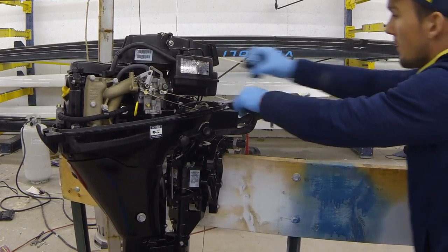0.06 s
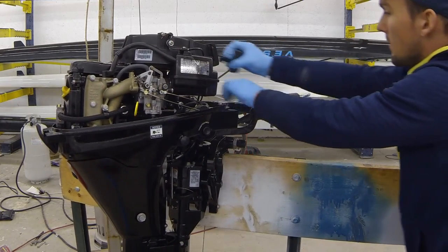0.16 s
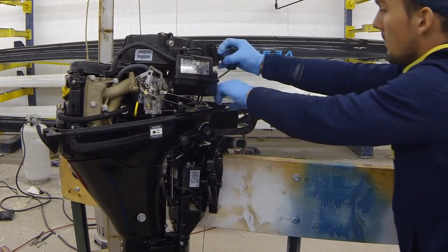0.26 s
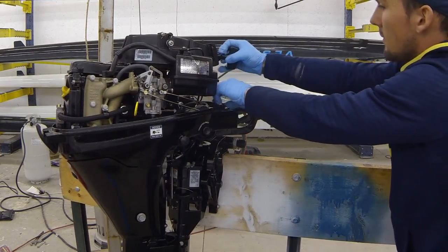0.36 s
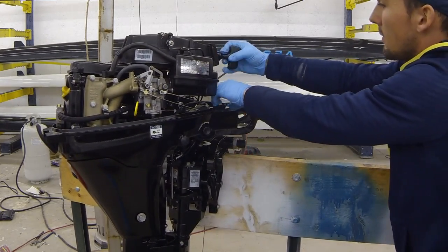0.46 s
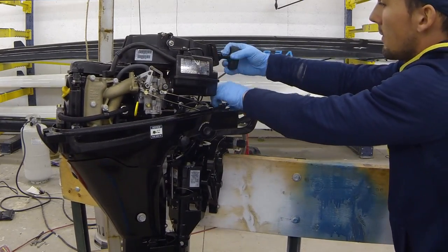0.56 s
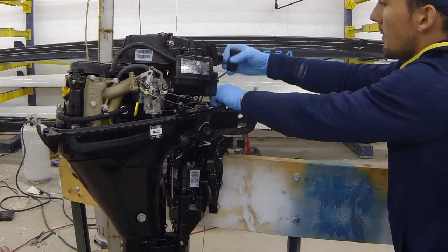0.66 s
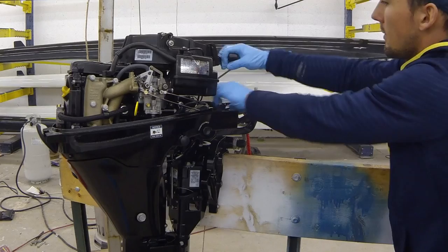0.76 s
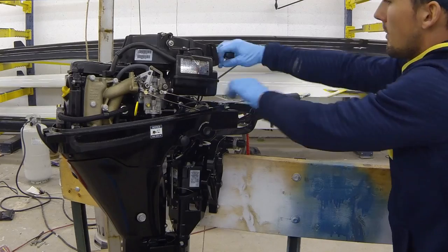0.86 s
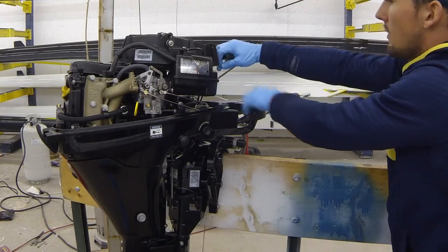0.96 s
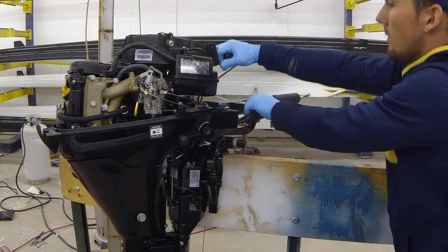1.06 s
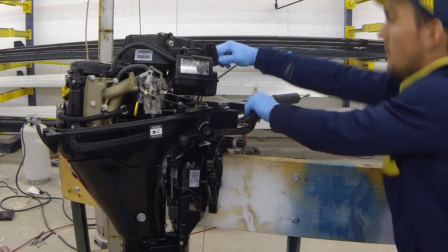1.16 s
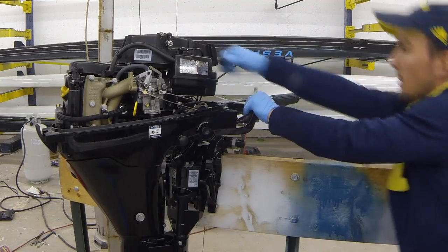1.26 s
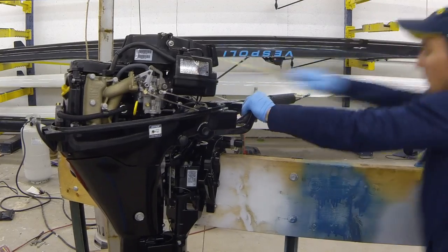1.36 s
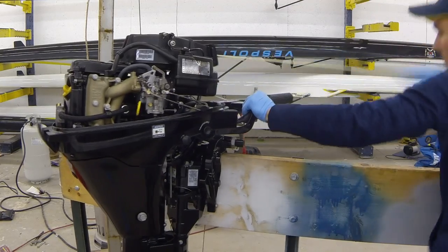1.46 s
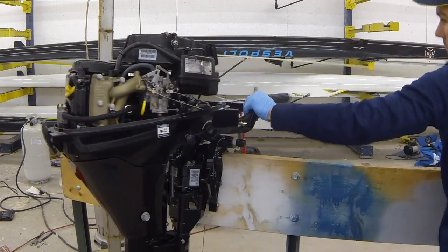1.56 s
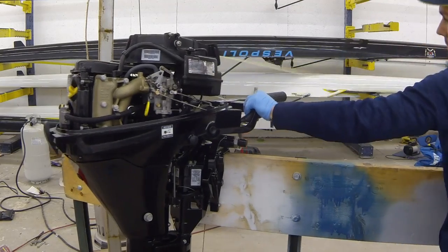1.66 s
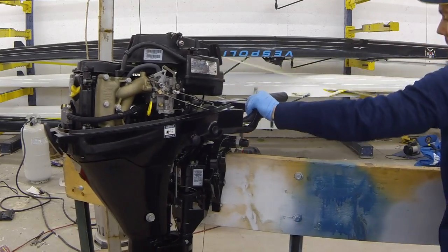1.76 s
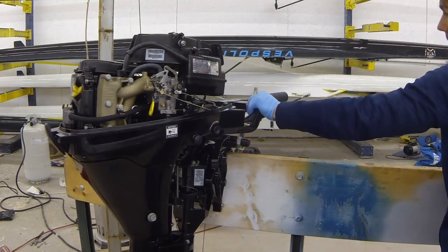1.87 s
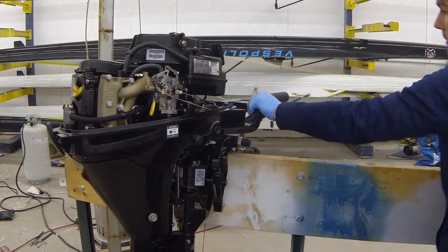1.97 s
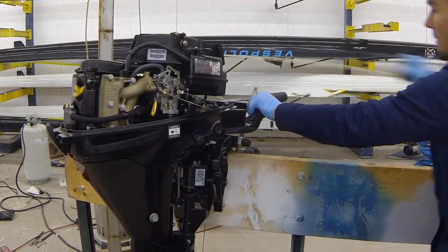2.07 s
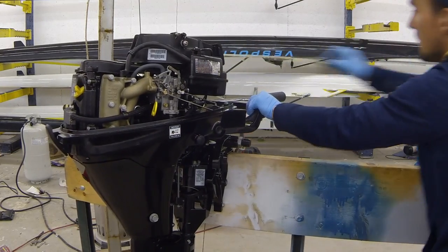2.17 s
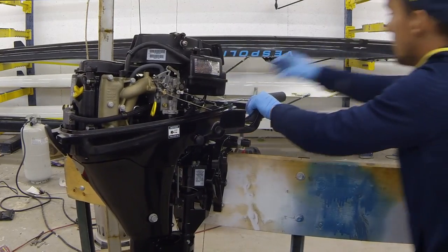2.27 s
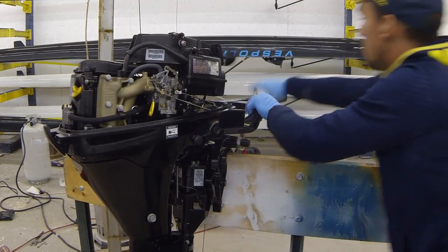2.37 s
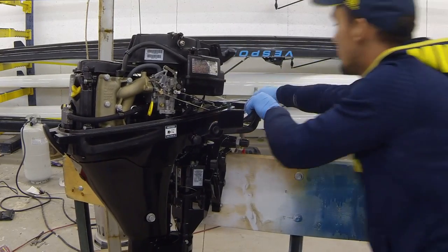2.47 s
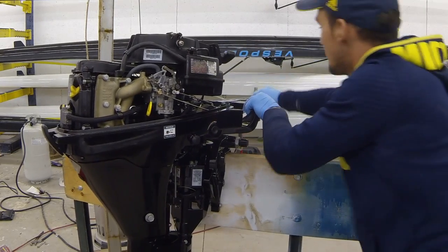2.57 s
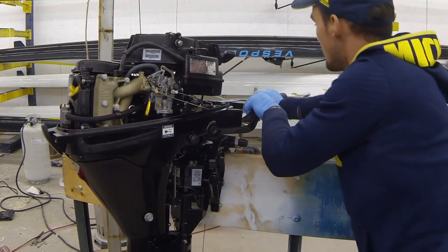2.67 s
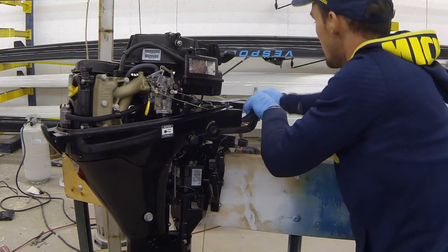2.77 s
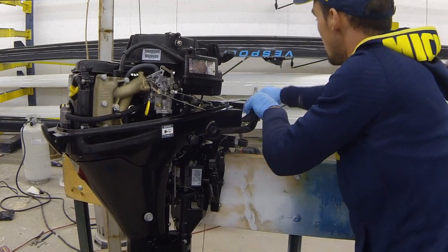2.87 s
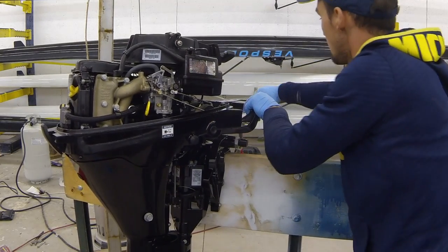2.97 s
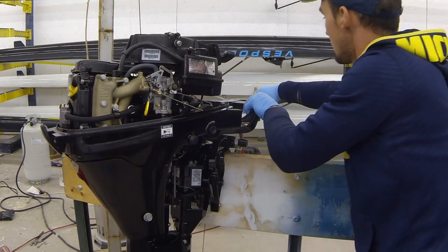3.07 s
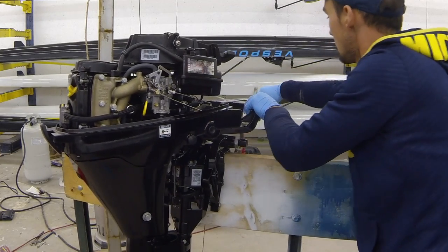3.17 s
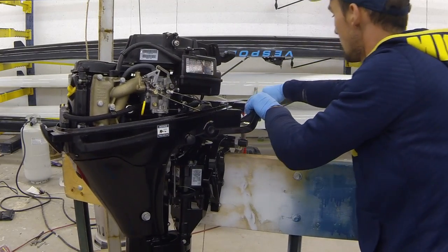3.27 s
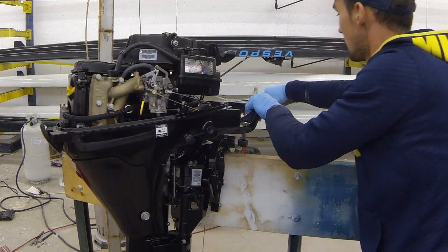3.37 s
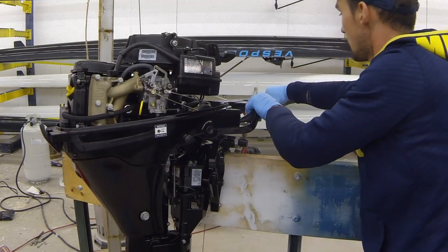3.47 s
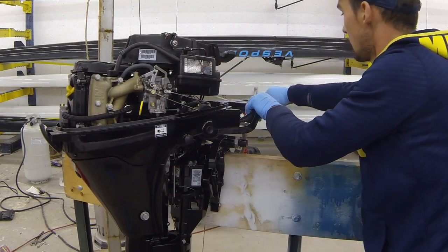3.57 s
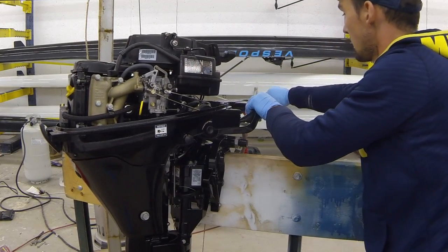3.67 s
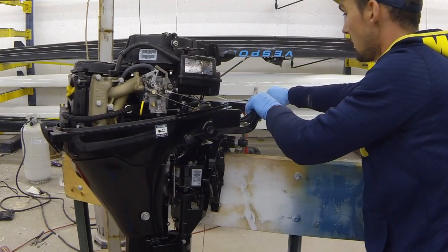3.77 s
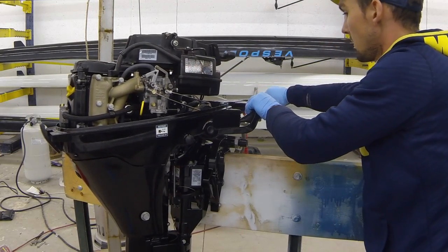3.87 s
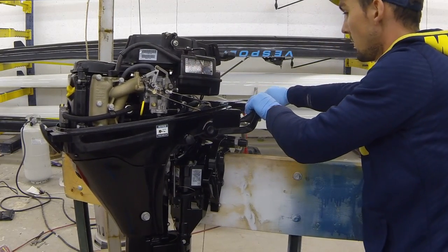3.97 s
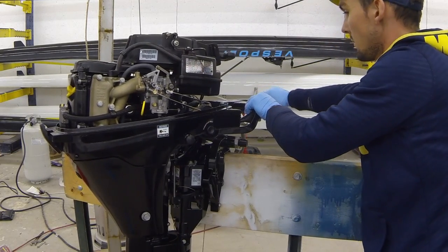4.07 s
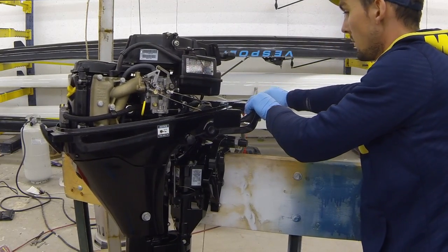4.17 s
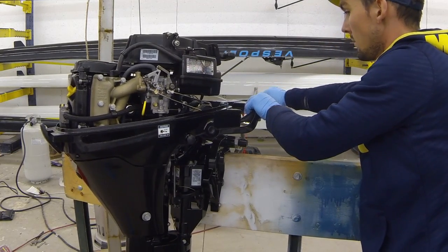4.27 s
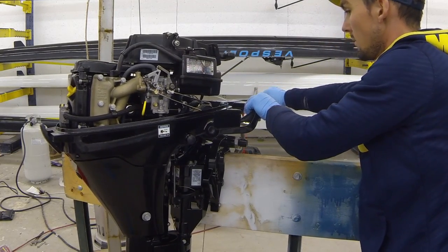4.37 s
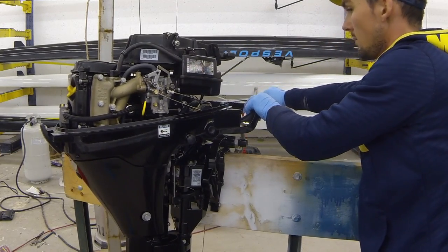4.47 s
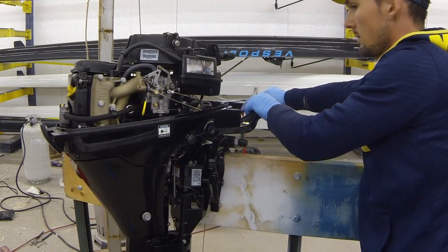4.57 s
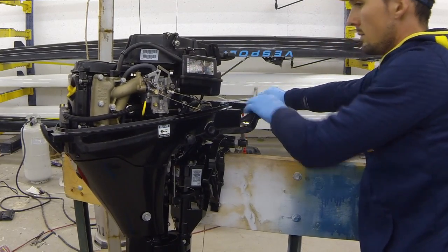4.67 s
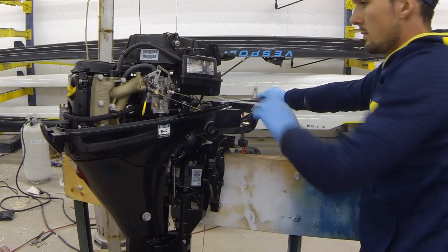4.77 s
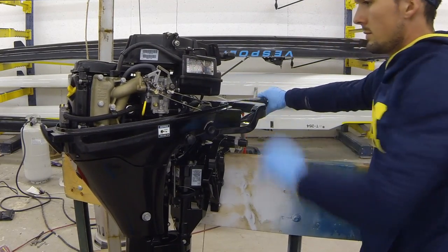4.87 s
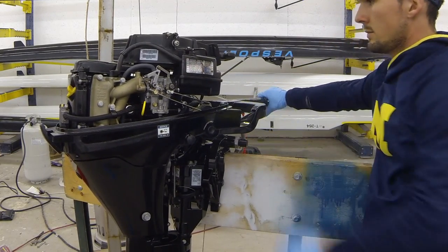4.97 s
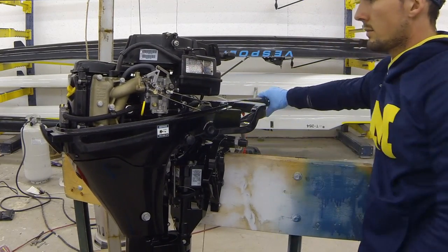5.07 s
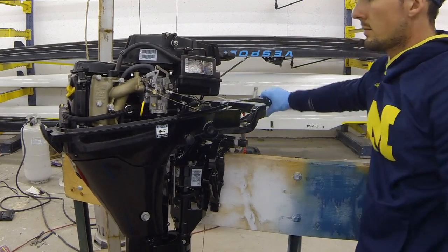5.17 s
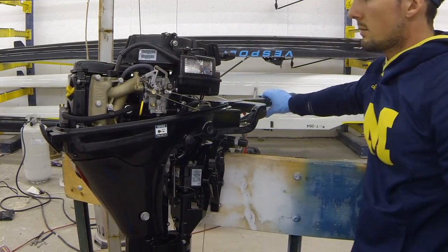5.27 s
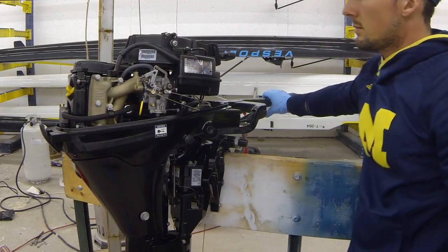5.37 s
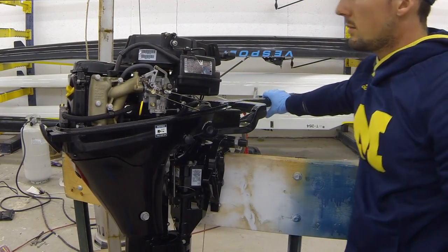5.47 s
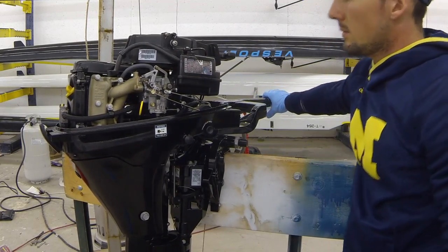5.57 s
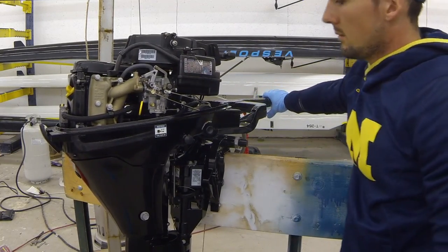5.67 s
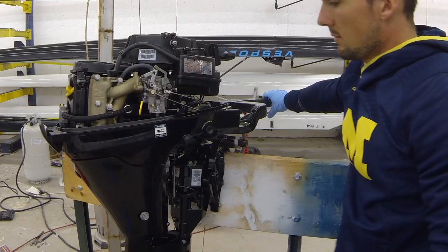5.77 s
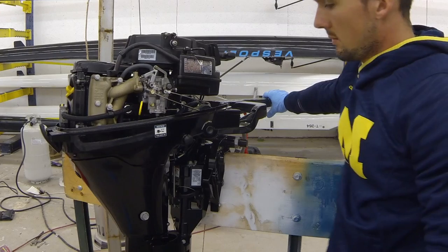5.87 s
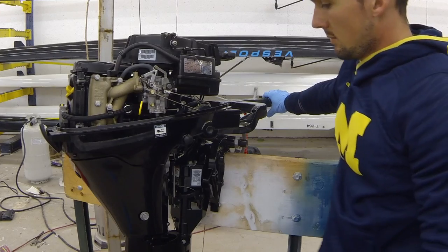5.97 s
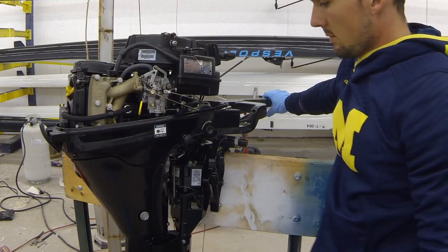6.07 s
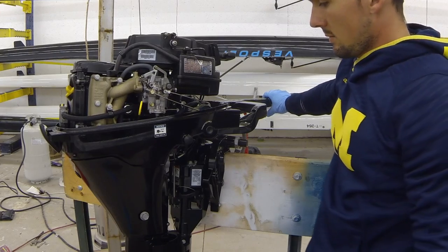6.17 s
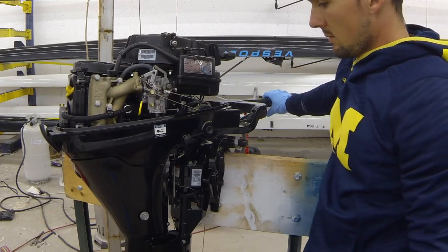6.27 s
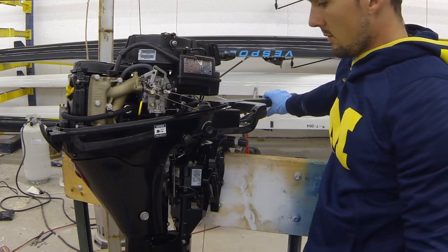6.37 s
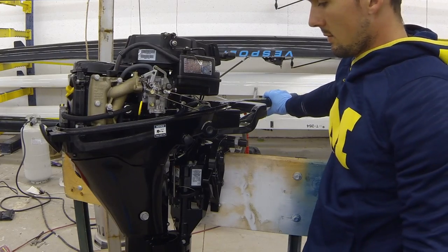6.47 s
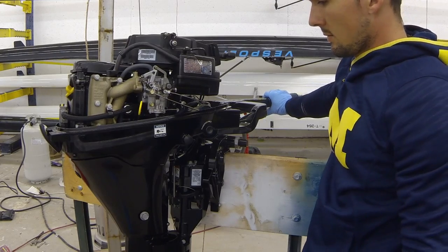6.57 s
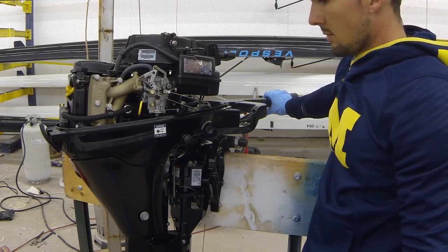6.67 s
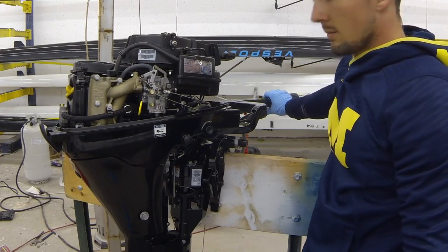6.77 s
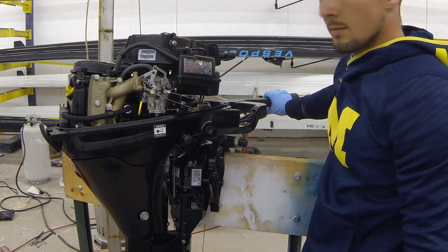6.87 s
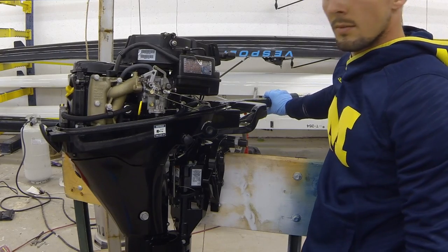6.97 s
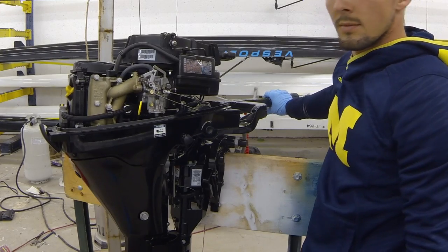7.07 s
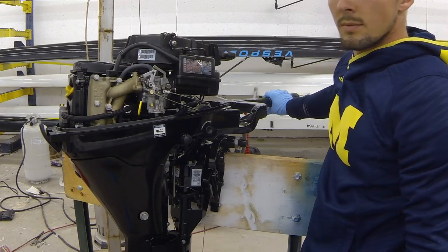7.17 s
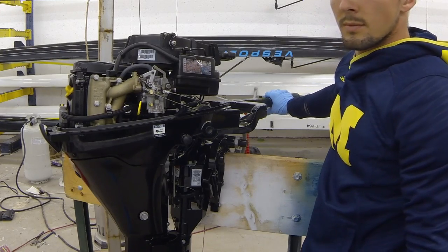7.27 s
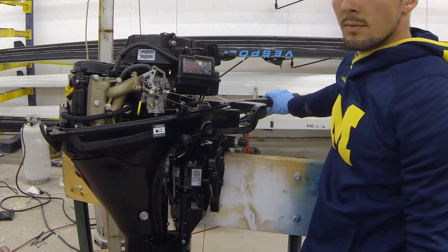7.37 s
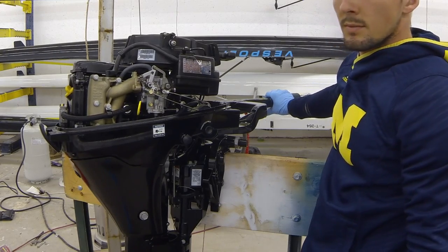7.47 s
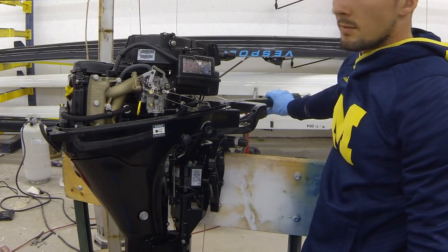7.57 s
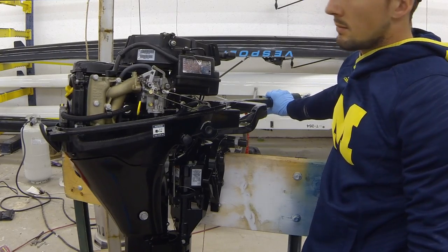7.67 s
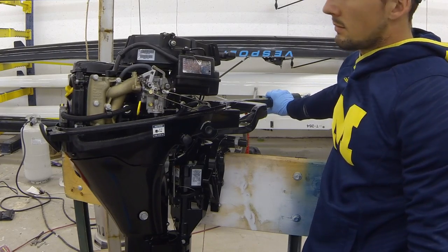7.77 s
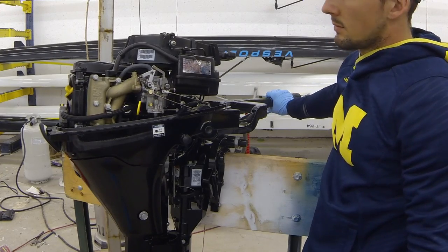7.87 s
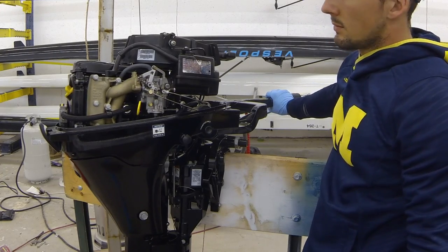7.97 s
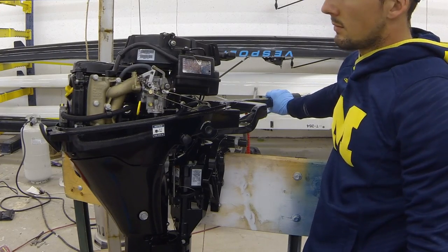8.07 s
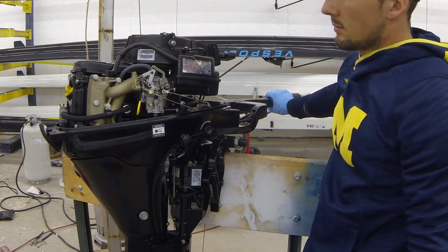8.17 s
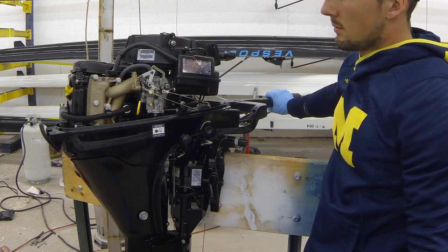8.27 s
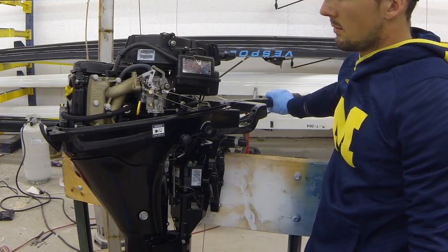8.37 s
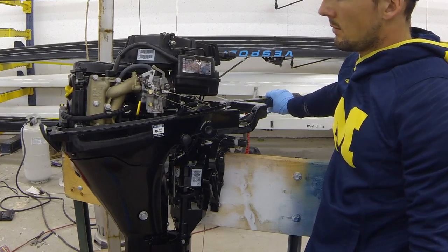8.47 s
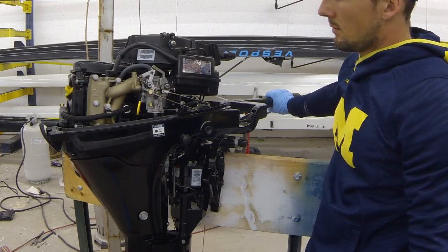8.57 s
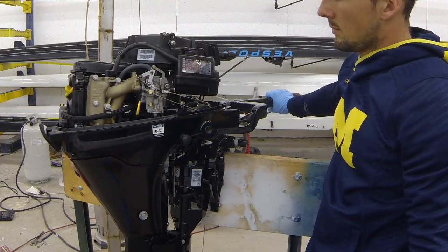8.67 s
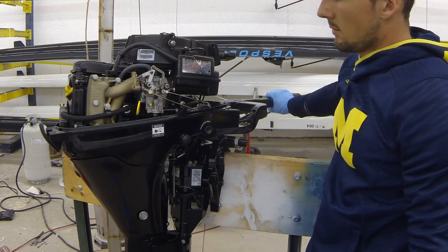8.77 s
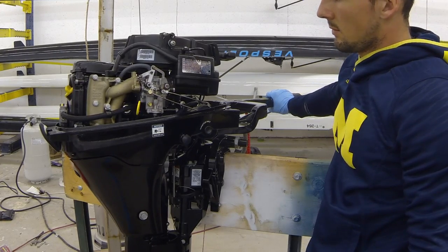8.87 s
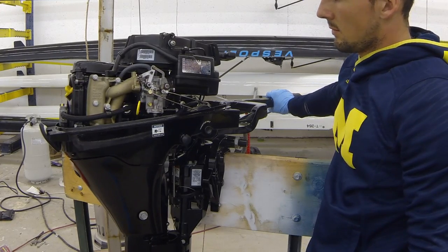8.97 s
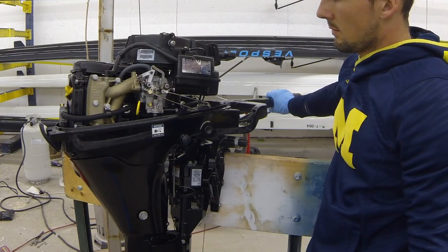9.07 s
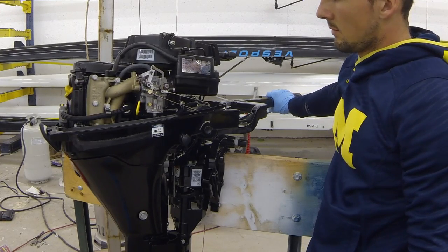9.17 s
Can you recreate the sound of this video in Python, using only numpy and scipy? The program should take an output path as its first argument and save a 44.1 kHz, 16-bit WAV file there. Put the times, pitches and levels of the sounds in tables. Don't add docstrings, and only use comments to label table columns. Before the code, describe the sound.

Starter rope whirs back and its handle knocks home; one hard pull clanks, and a small outboard motor catches, races, nearly stalls, then idles fast.

```python
import sys
import numpy as np
from scipy import signal
from scipy.fft import rfft, irfft
from scipy.io import wavfile
from scipy.ndimage import uniform_filter1d

SR = 44100
rng = np.random.default_rng(int(sys.argv[2]) if len(sys.argv) > 2 else 0)


def level_to_linear(level):
    exponent = np.asarray(level, float) / 20
    return 10 ** exponent


def to_wav(s):
    ch = np.atleast_2d(s).T
    pcm = np.round(np.clip(ch, -1, 1) * 32767)
    wavfile.write(sys.argv[1], SR, pcm.astype(np.int16))


N = 407043
T = np.arange(N) / SR

# (frequency [Hz], density [dB per Hz]); then its level [dB]
AIR_COLOUR, AIR_DB = [(15, -49), (25, -3), (44, 3.5), (55, -2), (136, -14), (189, -21.5), (214, -20.5),
                      (313, -21), (374, -35), (604, -22), (797, -23.5), (1110, -21), (1840, -28),
                      (9020, -45.5), (10500, -50), (13600, -88), (22000, -120)], -48.5
# (frequency [Hz], t60 [s])
SHOP_DECAY = [(150, 4.8), (650, 1.08), (1500, 0.73), (2600, 0.31), (7000, 0.4)]
# (frequency [Hz], width [Hz], share [1])
STANDING_WAVES = [(92.6, 10.2, 0.9), (117.8, 3.1, 1.35), (144.7, 3.8, 0.55), (175.6, 2, -0.91),
                  (198.3, 13, 0.67), (275.6, 12.4, 0.23)]

# (time [s], peak [dB], bounce delay [s], bounce level [dB], pitch factor [1])
HANDLE_KNOCKS = [
    (0.247, -12, 0.0089, -9.5, 0.96),
    (0.892, -25.5, 0.0098, -1, 0.99),
]
# (frequency [Hz], level [dB], t60 [s])
HANDLE_MODES = [(481, -21, 0.065), (669, -9.5, 0.078), (985, -12, .06), (1156, -5.5, 0.038),
                (1360, -4, 0.029), (1460, 0.5, 0.022), (2040, -18, 0.033), (3160, -11, 0.013),
                (3800, -28, 0.025), (7900, -29, .008)]
# (time [s], peak [dB], pitch factor [1])
PAWL_HITS = [(1.3, -39, 0.82), (1.334, -30.5, 1.9), (1.369, -3, 1.05), (1.38, -6.5, 1.01),
             (1.604, -19.5, 0.95), (1.627, -9, 1.01), (1.678, -28, 0.84), (1.691, -23, 1.6),
             (1.722, -10.5, 1.15)]
# (frequency [Hz], level [dB], t60 [s])
PAWL_MODES = [(662, -7.5, 0.29), (1518, 1, 0.081), (2100, -3.5, 0.076), (2750, -4.5, 0.034),
              (3680, -19, 0.24), (4020, -19, 0.44), (5150, -14, 0.057), (5960, -33, 0.34),
              (6400, -18, 0.051), (7386, -60, 0.053), (7550, -26, 0.19), (9300, -28, 0.19)]
# (time [s], peak [dB])
STARTER_TICKS = [(0.1815, -47), (0.2089, -47), (0.7694, -56), (1.247, -32.5)]
# (frequency [Hz], density [dB per Hz])
ROPE_COLOUR = [(59, -22), (100, -22), (202, -8), (416, -5), (656, 1.5), (914, -4), (1470, 2), (1880, -9),
               (2270, -8.5), (3160, -12), (3500, -14), (7690, -31), (14000, -89)]
# (time [s], level [dB], whirr centre [Hz])
ROPE_PULL = [(1.29, -74, 1300), (1.334, -31, 1450), (1.352, -44, 1480), (1.37, -6, 1470),
             (1.414, -18, 1210), (1.505, -16.5, 1510), (1.56, -18.5, 1230), (1.64, -13.5, 1520),
             (1.799, -40, 1550)]
REWIND_END_S = 0.24

# (time [s], firing rate [Hz])
FIRING_RATE = [(1.45, 7.31), (1.614, 14.48), (1.675, 22.53), (1.936, 24.59), (2.247, 46.15), (2.481, 48.27),
               (2.801, 47.03), (2.806, 43.46), (3.059, 48.35), (3.439, 28.75), (3.734, 17.39),
               (4.103, 25.8), (4.352, 33.16), (4.656, 34.15), (7.009, 34.73), (8.328, 35.66),
               (8.679, 34.51), (9.25, 26.19)]
# (time [s], strength [dB], harshness against a smooth idle [dB])
BURN = [(1.58, -31, 3), (1.63, -17, 13.5), (1.74, -21.5, 6.5), (2.1, -17.5, 7.5), (2.3, -17, 6),
        (2.6, -17.5, 4), (2.87, -20, 2), (3.03, -17, 2.5), (3.16, -20, -4), (3.4, -25, -10.5),
        (3.6, -25, -12), (3.76, -24.5, -3), (3.9, -18, 4.5), (4.25, -16, 4), (4.5, -15, -1.5),
        (5.6, -13.5, 1), (8.4, -13, 0), (9.2, -16.5, -3)]
# (start [s], end [s], level [dB])
MISFIRES = [
    (1.745, 1.785, -11),
    (2.545, 2.635, -40),
    (2.66, 2.885, -14.5),
    (2.89, 2.92, 6.5),
]
# (time [s], extra level [dB])
HARD_FIRINGS = [(2.1245, 3), (2.2218, 0.5), (2.4782, 0), (2.6433, 4.5), (2.7491, 9), (2.9306, 9.5),
                (4.3529, 1.5)]
# (worst time [s], extra level [dB], build [s], ease [s])
KNOCKING_BOUTS = [
    (1.912, 10.5, 0.24, 0.37),
    (3.87, 8, 0.062, 0.43),
]

# (delay [ms], share [1])
PIPE_ECHOES = [(7.2, .6), (13.4, .3), (23.0, .1), (31.0, .08)]
# (firing rate [Hz], level [dB])
CAVITY_BOOM = [(18, 3.5), (25, 3.5), (30, -3), (33.5, -7.5), (35.5, -5.5), (48, -0.5)]
# (firing rate [Hz], level [dB])
MUFFLER_CHAMBER = [(20, -20), (30, -12.5), (47, -1)]

# (frequency [Hz], width [Hz], level [dB])
CASING_CHOKED = [(603, 22, -3.5), (846, 24, 7), (1416, 220, -3.5), (1818, 70, 9), (2433, 150, 3),
                 (3726, 12, 3.5), (4240, 180, -4.5), (4503, 18, -8), (4950, 360, -7), (5350, 63, -5),
                 (5470, 49, -14), (5870, 14, -7.5), (6360, 37, -24.5), (6430, 68, -14), (8320, 21, -13),
                 (9240, 26, -32)]
# (frequency [Hz], width [Hz], level [dB])
CASING_IDLE = [(816, 60, 2.5), (1283, 64, -0.5), (1615, 23.7, 2.5), (2125, 90, -0.5), (2445, 144, -0.5),
               (3340, 14, -15), (3706, 18, -2), (4640, 220, -4), (5130, 156, -6.5), (5450, 15, -7.5),
               (5720, 11, -7.5), (6575, 20, -15.5), (7970, 66, -15), (8510, 13, -22.5), (9580, 15, -21.5)]
# (frequency [Hz], density [dB per Hz])
HISS_COLOUR = [(210, -33), (350, -7), (495, -19), (858, -16.5), (973, -12), (1460, -19.5), (1610, -13.5),
               (1910, -16.5), (2130, -12), (4070, -16.5), (4610, -31), (8000, -24), (11100, -38),
               (15000, -60)]
HISS_EDGES = [300, 1100, 2000, 3200, 4200, 6200, 9000, 16000]
# (frequency [Hz], width [Hz], level [dB])
STAND_VALLEYS = [(417, 23, -13.5), (984, 27.5, -15.5), (1830, 20, -40.5), (3935, 264, -6.5)]
# (time [s], frequency [Hz], level [dB])
INTAKE_WHISTLE = [(3.0, 810, -79), (3.1, 757, -38), (3.3, 731, -39.5), (3.6, 724, -44.5), (3.8, 685, -47)]


def evened(x):
    return x / np.sqrt(np.mean(x ** 2) + 1e-20)


def levelled(x, span=0.32):
    width = int(span * SR)
    power = uniform_filter1d(uniform_filter1d(x ** 2, width), width)
    return x / np.sqrt(abs(power) + 1e-3 * np.mean(x ** 2))


def read(points, hz):
    f, value = np.transpose(points)
    return np.interp(np.log(hz + 1), np.log(f + 1), value)


def curves(rows):
    s, *columns = np.transpose(rows)
    return [np.interp(T, s, column) for column in columns]


def coloured(x, spectrum):
    gain = level_to_linear(read(spectrum, np.fft.rfftfreq(len(x), 1 / SR)))
    return irfft(rfft(x) * gain, len(x))


def resonate(x, hz, width):
    turn = np.exp(2j * np.pi * np.cumsum(hz * np.ones(len(x))) / SR)
    r = np.exp(-np.pi * width / SR)
    return 2 * (turn * signal.lfilter([1 - r], [1, -r], x / turn)).real


def add(mix, s, sound):
    part = mix[round(s * SR):][:len(sound)]
    part += sound[:len(part)]


def room_air():
    return level_to_linear(AIR_DB) * evened(coloured(rng.standard_normal(N), AIR_COLOUR))


def shop(x):
    taps = np.zeros(2 * SR)
    at = np.arange(700, len(taps) - 20, 20)
    taps[at + rng.integers(0, 20, len(at))] = rng.choice([-1., 1.], len(at))
    hz, t, z = signal.stft(taps, SR, nperseg=256)
    t60 = np.clip(read(SHOP_DECAY, hz), .2, 2.5)[:, None]
    tail = signal.istft(z * level_to_linear(-60 * t / t60), SR, nperseg=256)[1]
    return signal.fftconvolve(x, tail / np.linalg.norm(tail))[:N]


def struck(modes, pitch, damp, crack_db):
    t = np.arange(9000) / SR
    ring = 0
    for hz, db, t60 in modes:
        ring = ring + level_to_linear(db - 60 * t / (damp * min(t60, .2))) * np.sin(2 * np.pi * hz * pitch * t)
    crack = level_to_linear(crack_db) * np.exp(-t / 0.00086) * uniform_filter1d(rng.standard_normal(len(t)), 3)
    hit = (ring + crack) * (1 - np.exp(-t / 0.0016))
    return hit / abs(hit).max()


def starter_hits():
    out = np.zeros(N)
    for s, db, after, bounce_db, pitch in HANDLE_KNOCKS:
        add(out, s, level_to_linear(db) * struck(HANDLE_MODES, pitch, 1.0, -19))
        add(out, s + after, level_to_linear(db + bounce_db) * struck(HANDLE_MODES, 1.03 * pitch, 0.82, -24))
    for s, db, pitch in PAWL_HITS:
        add(out, s, level_to_linear(db) * struck(PAWL_MODES, pitch, 0.43, 6.8))
    for s, db in STARTER_TICKS:
        add(out, s, level_to_linear(db) * np.exp(-np.arange(400) / 70) * rng.standard_normal(400) / 2)
    return out


def rope_whirr():
    rewind = [(0, -40.5, 1420), (REWIND_END_S, -51.5, 1420)]
    level_db, whirr_hz = curves(rewind + list(ROPE_PULL))
    unevenness_db = 2.8 * evened(uniform_filter1d(rng.standard_normal(N), 300))
    rub = rng.standard_normal(N) * level_to_linear(unevenness_db)
    whirr = evened(coloured(rub, ROPE_COLOUR))
    whirr += 0.54 * evened(resonate(rub, whirr_hz, 110))
    whirr += 0.13 * evened(resonate(rub, 695, 55))
    moving = np.clip((REWIND_END_S - T) / 0.026, 0, 1)
    moving += (T > ROPE_PULL[0][0]) * np.clip((1.8 - T) / 0.2, 0, 1)
    return level_to_linear(level_db - 6.5) * evened(whirr) * moving


def crank():
    return np.cumsum(curves(FIRING_RATE)[0] * (T > FIRING_RATE[0][0])) / SR


def train(turns, at, size):
    cycle = np.floor(turns - at).astype(int)
    return (np.diff(cycle, prepend=cycle[0]) > 0) * size[cycle + 1]


def cleared(choked, clear):
    return choked + (clear - choked) / (1 + np.exp((5.3 - T) / 0.24))


def softness():
    return np.maximum(-curves(BURN)[1] - 3, 0)


def firings(turns):
    second_db = sum(db * (T > start) * (T < end) for start, end, db in MISFIRES)
    starved = np.minimum(abs(rng.standard_normal(400)), 1.5)[turns.astype(int)]
    stumble_db = -.5 * softness() * starved
    strength = level_to_linear(0.66 * rng.standard_normal(400))
    return train(turns, 0, strength) * level_to_linear(second_db * (np.floor(turns) % 2 == 1) + stumble_db)


def knocking_bouts():
    return sum(db * np.exp(-np.where(T < s, (s - T) / build, (T - s) / ease))
               for s, db, build, ease in KNOCKING_BOUTS)


def strike_casing(turns, blows, cycle):
    s, db = np.transpose(HARD_FIRINGS)
    hard_db = np.zeros(400)
    hard_db[np.round(np.interp(s, T, turns)).astype(int)] = db
    chance_db = 0.31 * rng.standard_normal(400)[cycle]
    return np.roll(blows, -90) * level_to_linear(hard_db[cycle] + knocking_bouts() + chance_db)


def rattle_bursts(turns, strikes):
    u = np.arange(1500) / SR
    burst = (1 - np.exp(-u / .001)) * np.exp(-u / .007)
    between = level_to_linear(-6.5) * train(turns, 0.537, np.ones(400))
    return 2.0 * signal.oaconvolve(strikes + between, burst)[:N]


def rattle(cycle, bursts, steady_db):
    chance_db = 3.0 * np.clip(rng.standard_normal(400), -1.6, 1.6)[cycle]
    cylinder_db = rng.uniform(-4, 2.55) * (-1) ** cycle
    luck = uniform_filter1d(level_to_linear(chance_db + cylinder_db), 100)
    envelope = level_to_linear(steady_db) + luck * np.roll(bursts, rng.integers(20, 110))
    return luck, envelope * rng.standard_normal(N)


def casing_rings(cycle, strikes, bursts, steady_db, treble_db):
    rings = np.zeros(N)
    for modes, side in ((CASING_CHOKED, -1), (CASING_IDLE, 1)):
        present = 1 / (1 + np.exp(-side * (T - 3.805) / 0.034))
        for hz, width, db in modes:
            luck, drive = rattle(cycle, bursts, steady_db)
            drive += 18 * luck * np.roll(strikes, rng.integers(60, 220))
            width = max(width, 70, hz / 55)
            ring = resonate(resonate(drive, hz, width), hz, 1.7 * width)
            rings += level_to_linear(db + treble_db * (hz > 4000)) * present * ring
    return rings


def gas_hiss(cycle, bursts, steady_db, treble_db):
    f = np.fft.rfftfreq(N, 1 / SR)
    hiss = np.zeros(N)
    for lo, hi in zip(HISS_EDGES, HISS_EDGES[1:]):
        noise = rattle(cycle, bursts, steady_db)[1] * level_to_linear(treble_db * (lo > 4000))
        hiss += irfft(rfft(noise) * (f >= lo) * (f < hi), N)
    return coloured(hiss, HISS_COLOUR)


def stand_echo(x):
    f = np.fft.rfftfreq(N, 1 / SR)
    gain_db = sum(db * np.exp(-.5 * ((f - hz) / w) ** 2) for hz, w, db in STAND_VALLEYS)
    return irfft(rfft(x) * level_to_linear(gain_db), N)


def intake_whistle():
    hz, db = curves(INTAKE_WHISTLE)
    return level_to_linear(db) * evened(resonate(resonate(rng.standard_normal(N), hz, 41), hz, 110))


def clatter(turns, blows):
    harsh_db = curves(BURN)[1]
    treble_db = -1.47 + 0.34 * harsh_db
    steady_db = -9 + 1.6 * np.maximum(-harsh_db - 8.0, 0)
    cycle = np.floor(turns + .1).astype(int)
    strikes = strike_casing(turns, blows, cycle)
    bursts = rattle_bursts(turns, strikes)
    rings = casing_rings(cycle, strikes, bursts, steady_db, treble_db)
    hiss = gas_hiss(cycle, bursts, steady_db, treble_db)
    hiss_db = cleared(-0.5, -3.0) - 0.15 * knocking_bouts()
    sound = stand_echo(evened(rings) + level_to_linear(hiss_db) * evened(hiss))
    sound = level_to_linear(-29.5 + harsh_db) * levelled(sound) + intake_whistle()
    return sound * np.clip((T - 1.6) / 0.08, 0, 1)


def puff(hz, width_ms, lean):
    t = np.arange(-1000, 1001) / SR
    return np.exp(-.5 * ((t * 1000 - lean) / width_ms) ** 2) * np.cos(2 * np.pi * hz * t)


def exhaust_blast(blows):
    sharp = np.clip(cleared(0.66, 0.81), 0, 1)
    blast = signal.oaconvolve(blows * sharp, puff(212, 2, 1.1), "same")
    return blast + signal.oaconvolve(blows * (1 - sharp), puff(165, 2.6, 1.4), "same")


def leg_pipe(blast):
    pipe = np.zeros(2000)
    pipe[0] = 1
    for ms, share in PIPE_ECHOES:
        pipe[round(ms * SR / 1000)] = share
    return signal.oaconvolve(blast, pipe)[:N]


def intake_gulp(turns):
    gulps = train(turns, 0.549, level_to_linear(0.52 * rng.standard_normal(400))) * level_to_linear(cleared(-13, -6.5))
    return signal.oaconvolve(gulps, puff(200, 2.3, 0), "same")


def leg_boom(blows):
    push = signal.oaconvolve(blows, puff(99.7, 3.77, 0.19), "same")
    return resonate(push, 126.5, 22) + 0.88 * resonate(push, 75.0, 47) + 0.12 * resonate(push, 180, 51)


def exhaust(turns, blows):
    level_db, speed_hz = curves(BURN)[0], curves(FIRING_RATE)[0]
    blast = exhaust_blast(blows)
    pulses = leg_pipe(blast) - intake_gulp(turns)
    chamber_db = read(MUFFLER_CHAMBER, speed_hz) + cleared(0, -5.5)
    overtones = resonate(blows, 450, 21.4)
    overtones += .5 * resonate(blows, 555.3, 28) + .5 * resonate(blows, 703.0, 12.4)
    sound = level_to_linear(-.9 * softness()) * evened(pulses)
    sound += level_to_linear(read(CAVITY_BOOM, speed_hz) - 5.0) * evened(leg_boom(blows))
    sound += level_to_linear(chamber_db) * evened(resonate(blast, 177.8, 57))
    sound = levelled(sound + level_to_linear(-23.5) * evened(overtones))
    sound += sum(share * resonate(sound, hz, width) for hz, width, share in STANDING_WAVES)
    rumble = resonate(resonate(rng.standard_normal(N), 210, 270), 210, 270)
    sound += level_to_linear(cleared(-15.0, -18.5) + 0.72 * softness()) * evened(rumble)
    return level_to_linear(level_db) * sound * np.clip((T - 1.42) / 0.049, 0, 1)


def scene():
    turns = crank()
    blows = firings(turns)
    hits, rope = starter_hits(), rope_whirr()
    low, high = exhaust(turns, blows), clatter(turns, blows)
    wet = level_to_linear(-9) * hits + level_to_linear(-23) * rope + level_to_linear(-24) * low + level_to_linear(-9) * high
    return (hits + rope + low + high + shop(wet) + room_air())[None]


def low_pass(x):
    return signal.sosfilt(signal.butter(12, 15430, fs=SR, output="sos"), x)


def record(dry):
    dull = signal.sosfilt(signal.butter(6, 13500, fs=SR, output="sos"), dry)
    mix = 1.802 * np.tanh(dull / 1.996)
    return low_pass(mix)


dry = scene()
out = record(dry)
to_wav(out)
```